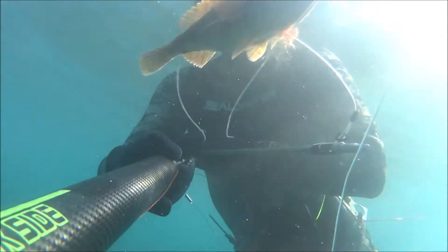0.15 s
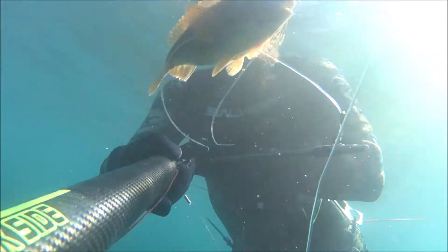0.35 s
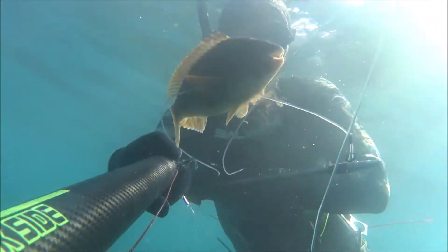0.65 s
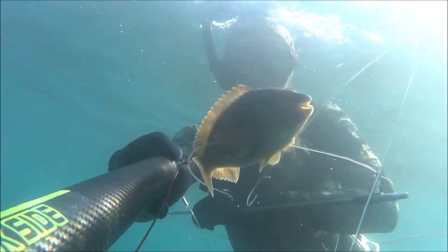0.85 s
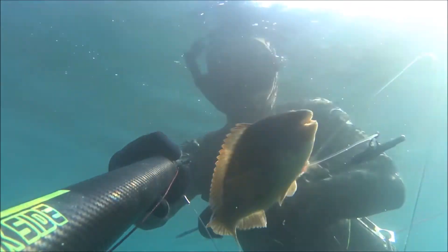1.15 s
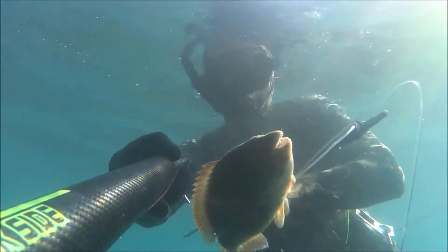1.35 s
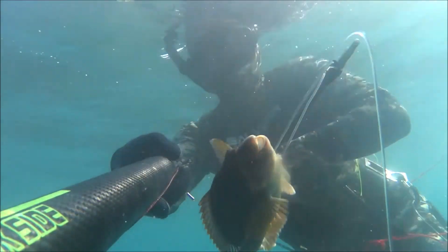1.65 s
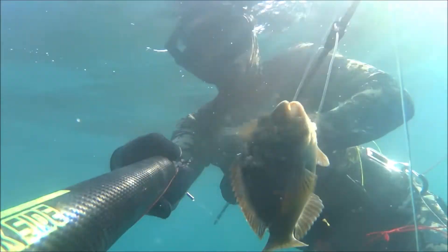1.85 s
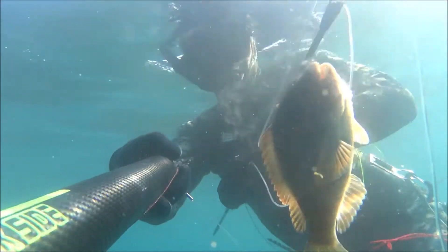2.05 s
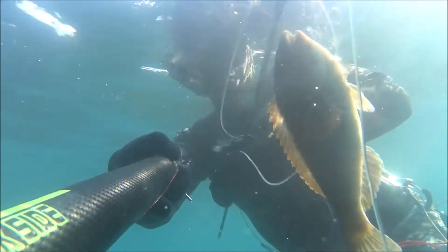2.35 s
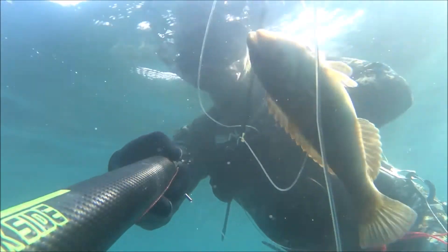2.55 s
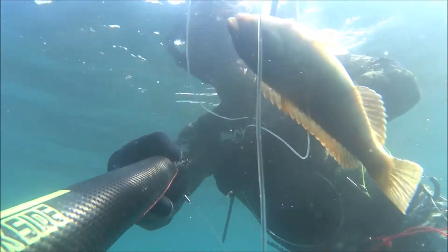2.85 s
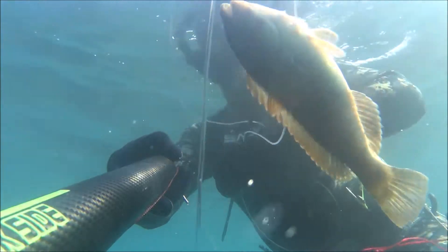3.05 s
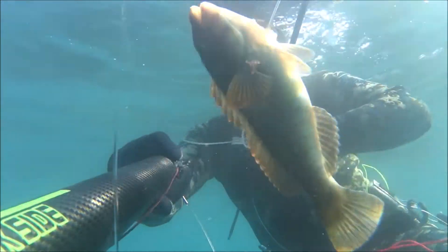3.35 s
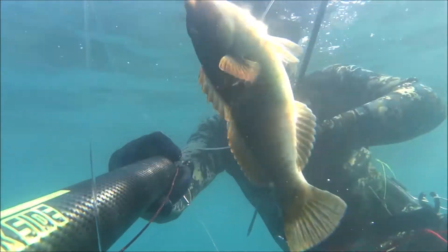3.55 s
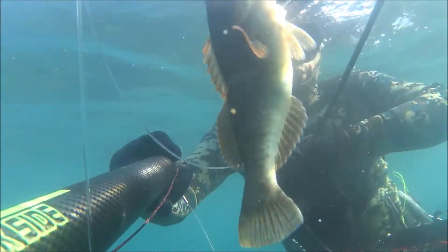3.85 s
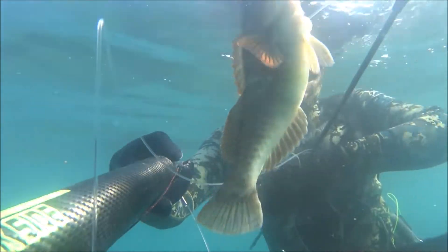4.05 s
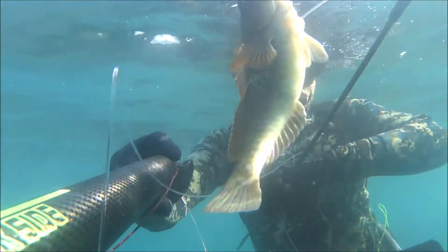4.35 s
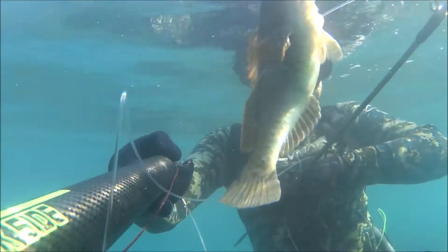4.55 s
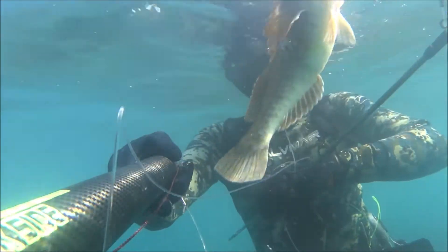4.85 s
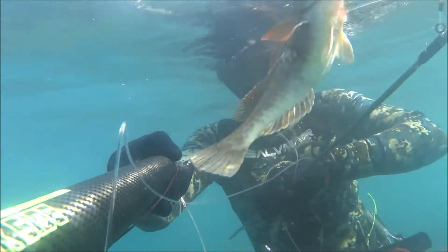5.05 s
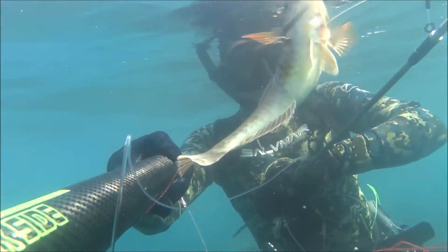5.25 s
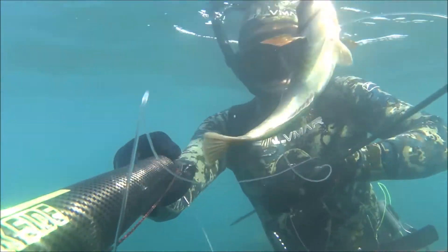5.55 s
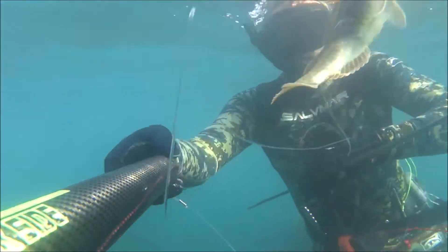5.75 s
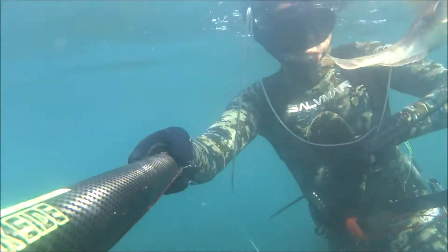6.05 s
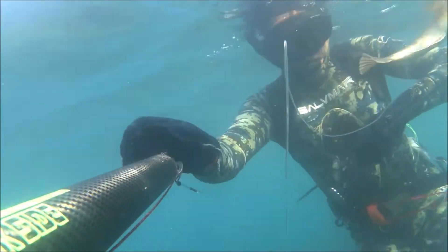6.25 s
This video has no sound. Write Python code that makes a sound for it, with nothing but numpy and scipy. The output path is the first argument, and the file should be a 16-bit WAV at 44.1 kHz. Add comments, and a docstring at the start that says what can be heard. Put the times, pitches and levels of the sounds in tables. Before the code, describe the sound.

Muffled tube knocks, scattered crackling ticks and one brief low line strum under water, then gritty rubbing and clustered knocks, over constant soft hiss.

```python
"""Knocks, a strumming line and a rubbing glove ring a speargun barrel under water, over a steady hiss.
A camera clamped to the barrel hears its decaying modes at two ports with different level and phase.
The strum is two wavering sines; sharp ticks (snapping shrimp, tackle) are noise bursts ringing the housing.
Faint narrow squeaks and slow pressure sway are filtered noise; the hiss is sea and electronics."""
import sys
import numpy as np
from scipy import signal
from scipy.fft import rfft, irfft, next_fast_len
from scipy.io import wavfile
from scipy.ndimage import map_coordinates

SR = 44100
rng = np.random.default_rng(int(sys.argv[2]) if len(sys.argv) > 2 else 0)


def to_wav(sig):
    """Store sig (one row per channel, or 1-D mono) as 16-bit WAV at the path in sys.argv[1].

    Samples outside -1..1 are clipped; the rate is SR.
    """
    pcm = np.clip(np.atleast_2d(sig), -1, 1) * 32767
    pcm = np.round(pcm).astype(np.int16)
    wavfile.write(sys.argv[1], SR, pcm.T)  # frames by channels


N = 282240
PORTS = np.array([[.5], [-.5]])  # left, right: half of each level or phase difference

# Barrel modes in six groups, low to high. Each row: frequency in Hz, level in dB, t60 in seconds,
# left over right in dB, left lead in rad.
BARREL_MODES = [
    [(72.5, 0, 0.18, -4, 1.33)],
    [(121.1, 0, 0.13, -1.5, 1.43)],
    [(160.6, -0.5, 0.052, -3.5, 3.13), (251.5, 4.5, 0.052, 6, 1.935), (291, -7, 0.072, 3, 2.36),
     (398.8, -5.5, 0.054, -2.5, 1.63)],
    [(470, 4, 0.05, -0.5, 2.17), (588, -3, 0.062, 1, 2.43)],
    [(687, -1, 0.028, 11.5, 0.32), (752.3, 5, 0.033, 5, 2.4), (827.4, -6.5, 0.029, -18, 0.88)],
    [(1107, -4, 0.017, 1.5, 2.18), (1239, -4, 0.01, -3.5, 2.47), (1463, -4, 0.014, 2.5, 3.66),
     (1624, -10.5, 0.014, 1.5, 3.6), (1820, -24.5, 0.016, 7.5, 2.32), (2860, -19, 0.0043, 2.5, 1.2)],
]


def amp(db):
    """Decibels to gain."""
    return 10 ** (np.asarray(db) / 20)


def curves(rows):
    """Interpolate each column after the time to one value per sample."""
    s, *columns = np.transpose(rows)
    t = np.arange(N) / SR
    return [np.interp(t, s, column) for column in columns]


def wobble(knots_per_s):
    """Smooth random curve through normally distributed knots."""
    knots = rng.standard_normal(int(N * knots_per_s / SR) + 4)
    return map_coordinates(knots, [np.arange(N) * knots_per_s / SR])


def filtered(x, response):
    """Multiply the spectrum of x by a complex response of frequency in Hz."""
    m = next_fast_len(N + SR // 2)
    return irfft(rfft(x, m) * response(np.fft.rfftfreq(m, 1 / SR)), m)[..., :N]


def band(hz, width_hz):
    """Noise of rms 1 in a bell-shaped band."""
    x = filtered(rng.standard_normal(N), lambda f: np.exp(-((f - hz) / width_hz) ** 2))
    return x / x.std()


def ringing(modes, length_s, rise_cycles, delay_100hz_s):
    """Stereo answer of modes to one blow: gradual build-up, decay; bending waves arrive later at low pitch."""
    out = 0
    for hz, db, t60_s, pan_db, lead_rad in modes:
        delay_s = delay_100hz_s * np.sqrt(100 / hz)
        t = np.maximum(np.arange(int(length_s * SR)) / SR - delay_s, 0)
        decay = amp(db + PORTS * pan_db - 60 * t / t60_s)
        rise = 1 - np.exp(-t * hz / rise_cycles)
        out = out + decay * rise * np.sin(2 * np.pi * hz * t + PORTS * lead_rad)
    return out


def barrel():
    """Blows and rubbing are forces; every mode group answers its own share of each."""
    # Each row: time in seconds, level in dB before group shares, hardness (clack over thud) in dB,
    # place (second over first group) in dB, extra on the third group in dB.
    knocks = [(0.131, -32.5, -28, 0, 2.5), (0.512, -36, -26, 0, 1), (0.575, -38, -34, -4.5, -1),
              (0.657, -44, -15.5, 1, -6), (0.72, -38, -32, 0.5, 0.5), (0.798, -37, -28, 5, 1.5),
              (0.881, -25.5, -13, 0.5, 1.5), (1.268, -56, -2.5, 4, 0), (1.394, -63.5, 5, 0, 6.5),
              (1.796, -43.5, -25, -7, -2), (2.067, -47, -15, -5, 3.5), (2.43, -28.5, -41, 7.5, -1),
              (2.75, -41, -24, 3, 5), (2.764, -30.5, -23.5, 4.5, 1.5), (3.06, -25.5, -23, -1, -0.5),
              (3.165, -32, -51, -0.5, -1.5), (3.915, -34.5, -28.5, 1, 2), (3.943, -41, -24, 4, 1.5),
              (4.305, -30, -24, 0, -0.5), (4.473, -71, 24.5, -3, -4), (4.765, -56, -20, 0, 7),
              (4.985, -45.5, -27, 3, -2), (5.119, -57.5, -9, 0, 6), (5.226, -47, 0, -3, 0.5),
              (5.257, -54, -3, -3, 3.5), (5.326, -50, -12, -5, -2.5), (5.421, -44.5, -9, 4, 1.5),
              (5.485, -35, -16.5, -6.5, 2), (5.788, -43, -1.5, 0, -1), (5.953, -31, -11, 1, 2),
              (5.987, -34.5, 4, 0.5, 5.5), (5.991, -36, 12.5, 1, -3.5), (6.102, -29.5, -13, -3, -6),
              (6.112, -32, -15, -17, -1), (6.138, -26.5, -21, -10, -3.5)]
    # Each mode group's share of a blow in dB.
    blow_share_db = [-1.5, 0, 2.5, 5.5, 8, 2]
    # How far each mode group follows hardness, 0-1.
    follows_hardness = [0.14, 0.1, 0.23, 0.73, 1, 1]
    # Build-up time constant of each mode group in cycles.
    rise_cycles = [1.4, 0.56, 1.07, 0.79, 2.2, 1.4]
    contact_s = .00009  # a blow is a short push, not an instant

    blows = np.zeros((len(BARREL_MODES), N))
    for s, db, hard_db, place_db, body_db in knocks:
        share_db = blow_share_db + hard_db * np.array(follows_hardness)
        share_db[:3] += [-place_db / 2, place_db / 2, body_db]
        blows[:, round(s * SR)] = amp(db + share_db)
    push = np.exp(-(np.arange(-30, 31) / SR / contact_s) ** 2)
    blows = signal.oaconvolve(blows, push[None] / push.sum(), "same", axes=1)
    rub_forces = rubbing() * rng.standard_normal(blows.shape)

    out = np.zeros((2, N))
    for modes, rise, blow, rub_force in zip(BARREL_MODES, rise_cycles, blows, rub_forces):
        ring = ringing(modes, .3, rise, delay_100hz_s=0.0033)
        peak = np.abs(ring).max()
        energy_norm = np.linalg.norm(ring) / np.sqrt(2)
        force = blow / peak + rub_force / energy_norm
        out += signal.fftconvolve(force[None], ring, axes=1)[:, :N]
    return out


def rubbing():
    """Force gain on each mode group: water buffeting plus the glove's strokes, both lumpy."""
    # Buffeting. Each row: time in seconds, level of the two low groups and of the high groups,
    # in dB before shares, strum and lumps.
    buffeting = [(0.0, -63, -67), (0.45, -62, -68), (0.74, -51, -65), (0.81, -52, -65), (0.97, -61, -67.5),
                 (1.35, -63, -71.5), (1.61, -63.5, -62), (1.84, -59, -64.5), (2.01, -48, -62),
                 (2.11, -54.5, -61.5), (2.2, -52, -60.5), (2.52, -63, -68), (2.75, -67.5, -70),
                 (3.06, -55.5, -69), (3.45, -68, -71), (4.2, -61.5, -72.5), (4.4, -66, -68),
                 (5.2, -64, -70)]
    # Two glove strokes along the barrel. Each row: time in seconds, level of the first, of the second
    # and of the high groups, in dB before shares and lumps.
    strokes = [
        [(5.43, -55, -55, -63), (5.5, -46, -51, -51), (5.6, -40, -41, -45.5), (5.7, -53, -42, -48.5),
         (5.86, -54, -37, -45), (5.93, -48, -50, -46), (6.0, -48, -40, -42.5), (6.06, -49, -60, -52)],
        [(6.075, -47, -58, -55), (6.11, -32, -35, -44.5), (6.15, -47, -42, -44.5), (6.215, -42, -43, -37.5),
         (6.245, -46, -31.5, -49), (6.27, -44.5, -48, -75), (6.36, -38, -51, -83)],
    ]
    # Share of each mode group in the buffeting, in dB.
    buffet_share_db = [0, -7, -3.5, -11, -9.5, -11]
    # Share of each mode group in the strokes, in dB.
    stroke_share_db = [0, 0, 1, 0, -3, -9]
    # Depth of the lumps on each mode group in dB per unit of wobble.
    lump_db = [2.3, 1.9, 1.26, 3.2, 3, 3]
    strum_calms_db = -10  # on buffeting of the two low groups, at full strum
    common_lump_db = 1.2

    def by_group(first_db, second_db, high_db, share_db):
        return amp(np.array([first_db, second_db] + [high_db] * 4) + np.c_[share_db])

    t = np.arange(N) / SR
    low_db, high_db = curves(buffeting)
    _, strum_swell_db = curves(strum_rows())
    low_db = low_db + strum_calms_db * amp(strum_swell_db)
    power = by_group(low_db, low_db, high_db, buffet_share_db) ** 2
    for stroke in strokes:
        touching = (t >= stroke[0][0]) & (t < stroke[-1][0])
        power = power + touching * by_group(*curves(stroke), stroke_share_db) ** 2
    # faster lumps on the higher groups, plus a part shared by all
    lumps = np.array([wobble(rate) for rate in (12, 20, 47, 49, 88, 150)])
    return np.sqrt(power) * amp(np.c_[lump_db] * lumps + common_lump_db * wobble(30))


def strum_rows():
    """Corners of swell, hold and fade: time in seconds, slips a second, dB relative to the hold."""
    start_s, swell_s, hold_s, fade_s = 1.741, 0.26, 0.176, 0.2
    slip_hz, sag_hz_per_s = 36.03, 15  # the rate sags during the fade
    edge_db = -18.5  # where the swell starts and the fade ends
    s = np.cumsum([start_s - .04, .04, swell_s, hold_s, fade_s, .04])
    slack_hz = slip_hz - sag_hz_per_s * fade_s
    return np.c_[s, [slip_hz] * 4 + [slack_hz] * 2, [-60, edge_db, 0, 0, edge_db, -60]]


def strum():
    """Regular line slips: second and third multiples near the two lowest modes, with their pan and lead."""
    # Hold level of the second and third multiple in dB, before pan and wobble.
    multiple_db = [-38.6, -50.5]
    slip_hz, swell_db = curves(strum_rows())
    phase = 2 * np.pi * np.cumsum(slip_hz * (1 + 0.021 * wobble(24.67))) / SR
    out = 0
    for multiple, db, [(_, _, _, pan_db, lead_rad)] in zip((2, 3), multiple_db, BARREL_MODES):
        gain = amp(db + swell_db + PORTS * pan_db + 0.95 * wobble(20))
        out = out + gain * np.sin(multiple * phase + PORTS * lead_rad)
    return out


def tick(peak_db, low_db, top_db):
    """A 5 ms decaying crackle with a sharp front rings the housing modes and is also heard differenced."""
    # Low housing modes. Each row: frequency in Hz, level in dB before tick lift and scatter,
    # t60 in seconds, left lead in rad.
    housing_low = [(2104, -3.5, 0.011, 1.56), (2990, 2, 0.0035, 1.2)]
    # Middle housing modes, same columns: Hz, dB, seconds, rad.
    housing_mid = [(4400, -2.5, 0.004, 1), (5650, 0, 0.0061, 0.26)]
    # Top housing modes, same columns: Hz, dB, seconds, rad.
    housing_high = [(6485, 2.5, 0.0049, -1.1), (7820, -4, 0.005, -0.29), (8660, -7, 0.0026, -0.61),
                    (9800, -8, 0.002, 0.39)]

    modes = []
    for group, lift_db in [(housing_low, low_db), (housing_mid, 0), (housing_high, top_db)]:
        for hz, db, t60_s, lead_rad in group:
            modes.append((hz, db + lift_db + rng.normal(0, 0.63), t60_s, 0, lead_rad))
    crackle = rng.standard_normal(220) * amp(-60 * np.arange(220) / SR / .013)
    crackle[0] = 0.76
    answer = ringing(modes, .03, rise_cycles=0.29, delay_100hz_s=0)
    answer[:, 1:3] += amp(top_db + 0.5) * np.array([1, -1])  # direct path
    ring = signal.fftconvolve(crackle[None], answer, axes=1)
    return amp(peak_db) * ring / np.abs(ring).max()


def ticks():
    """Clear ticks at set times, and a thin random scatter of faint far ones."""
    # Each row: time in seconds, peak in dB, low modes and top modes in dB against the middle ones.
    clear = [(0.208, -47, -5, -4), (0.3446, -52.5, -3, 6), (0.3554, -51, -4, -9), (0.6093, -46.5, -9, 0),
             (0.754, -48.5, -10, -3), (0.922, -52, 7, 6), (1.028, -39, -8, -4.5), (1.2444, -53.5, -8, -14),
             (1.8362, -48, -12, -1), (2.0535, -40, -7, -0.5), (2.4392, -49.5, -3, -4),
             (2.5012, -51, -4, 13), (2.8649, -49.5, -12, 5), (3.2034, -55, -10, 1), (3.3204, -57, -4, 3),
             (3.7329, -54, -8, -2), (3.7913, -50.5, 11, -9), (4.0327, -49, 8, -8), (4.075, -55, -5, 0),
             (4.2466, -50, 3, 5), (4.3071, -55, 0, -1), (4.338, -44.5, 5.5, -15),
             (4.4748, -27.5, -7.5, -2.5), (4.4934, -51, -8, 10), (4.9543, -49.5, 3, 4),
             (4.9665, -40, 1.5, -9), (4.982, -46, -9, 5), (5.2758, -45, 2, 3), (5.348, -46, -8, 0),
             (5.4166, -53, -4, 2), (5.466, -45, -8, -8), (5.7134, -43.5, -1, 7), (5.989, -49.5, -8, -6),
             (6.046, -47.5, -19, 10), (6.146, -46, -4, 0), (6.1657, -46, -3, 11), (6.315, -41.5, -4, -6)]
    far = [(u * N / SR, -62 + 7 * v, -4.5, -1.5) for u, v in rng.random((40, 2))]
    out = np.zeros((2, N + SR))
    for s, *strength_db in list(clear) + far:
        ring = tick(*strength_db)
        start = round(s * SR)
        out[:, start:start + ring.shape[1]] += ring
    return out[:, :N]


def squeaks():
    """Faint narrow hisses, as of wet rubber creeping, swell and fade; stronger at the left port."""
    # Each row: start in seconds, length in seconds, centre in Hz, width in Hz,
    # level in dB before swell and port gains.
    creeps = [(0.14, 0.57, 650, 71, -71), (.15, 0.59, 1770, 120, -76.5), (2.01, 0.36, 320, 70, -66),
              (2.21, 0.2, 1430, 199.2, -75), (4.247, 0.04, 1680, 300, -69), (5.225, 0.054, 1790, 400, -71),
              (5.226, 0.057, 780, 160, -59.5), (1.55, 0.22, 475, 80, -69.5), (6.172, 0.071, 2730, 300, -71)]
    t, out = np.arange(N) / SR, 0
    for s, length_s, hz, width_hz, db in creeps:
        progress = np.clip((t - s) / length_s, 0, 1)
        swell = np.sqrt(np.sin(np.pi * progress).clip(0))
        out = out + amp(db) * swell * band(hz, width_hz)
    return out * np.array([[1.6], [.4]])


def sway():
    """Slow water pressure, alike at both ports: low noise at a wandering level plus single swells."""
    # Each row: centre in seconds, rms at the centre in dB, added as gain to the wandering level.
    swells = [(.25, -61), (.4, -63), (.9, -65), (1.62, -53.5), (2.25, -57), (2.8, -60), (4.05, -60.5),
              (4.37, -60.5), (6.05, -53), (6.25, -54)]
    level_db, wander_db, swell_s = -67, 5, 0.08
    t = np.arange(N) / SR
    gain = amp(level_db + wander_db * wobble(12))
    for s, db in swells:
        gain = gain + amp(db) * np.exp(-((t - s) / swell_s) ** 2)
    return gain * band(24, 17.6) * np.ones((2, 1))


def hiss():
    """Noise shared by both ports, nearly opposite in phase in the middle range, plus each port's own."""
    # Each row: frequency in Hz, relative spectral level in dB, left-right likeness 0-1, left lead in rad.
    spectrum = [(15, -12, 1, -6), (45, -2.5, 0.9, 0.5), (131, -6.5, 1, 1), (236, -8.5, 0.6, 2.5),
                (517, -8.5, 0.76, 3), (950, -11.5, 0.98, 2.5), (1850, -19, 0.59, 4), (3370, -25.5, 0.26, 2),
                (4670, -28, 0.94, 1.5), (5620, -25.5, 1, 1.66), (6860, -30.5, 0.36, 0.5),
                (7650, -30.5, 1, 1), (11900, -34.5, 1, 1)]
    f, db, likeness, lead_rad = np.transpose(spectrum)

    def at(values, hz):
        return np.interp(np.log(hz + 1), np.log(f + 1), values)

    def alike(hz):
        return np.clip(at(likeness, hz), 0, 1)

    def shared_response(hz):
        turn = np.exp(1j * PORTS * at(lead_rad, hz))
        return amp(at(db, hz)) * np.sqrt(alike(hz)) * turn

    def own_response(hz):
        return amp(at(db, hz)) * np.sqrt(1 - alike(hz))

    shared = filtered(rng.standard_normal(N), shared_response)
    own = filtered(rng.standard_normal((2, N)), own_response)
    return amp(-38 + 0.66 * wobble(9.1)) * (shared + own)


def scene():
    """Barrel, line, ticks, squeaks, sway and hiss."""
    return barrel() + strum() + ticks() + squeaks() + sway() + hiss()


def record(dry):
    """The camera keeps nothing above its band limit."""
    top_hz = 11150
    return filtered(dry, lambda hz: hz < top_hz)


dry = scene()
out = record(dry)
to_wav(out)
```